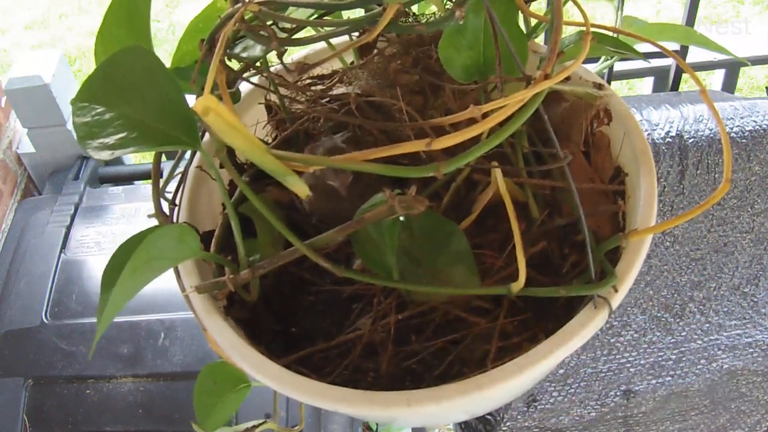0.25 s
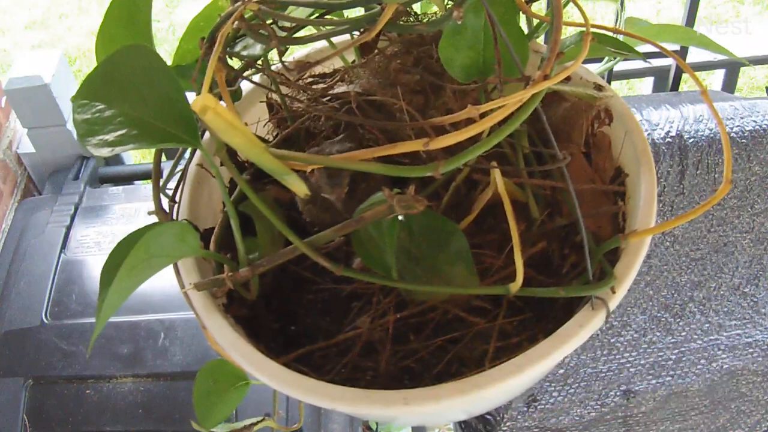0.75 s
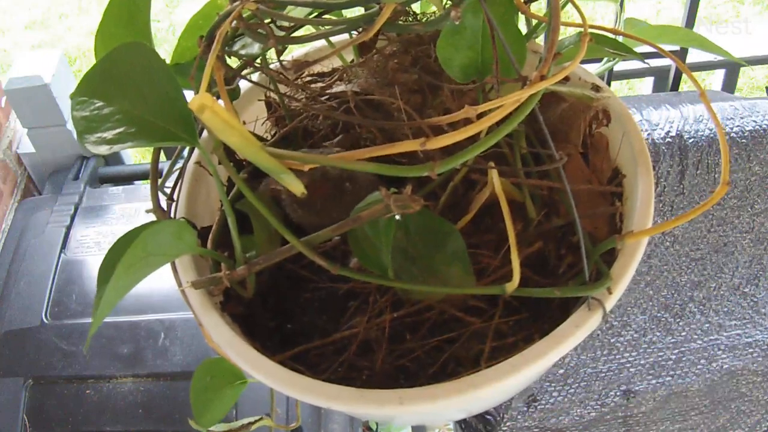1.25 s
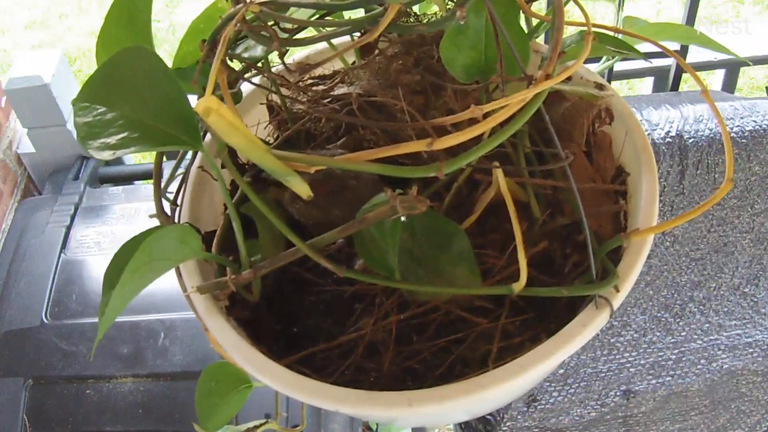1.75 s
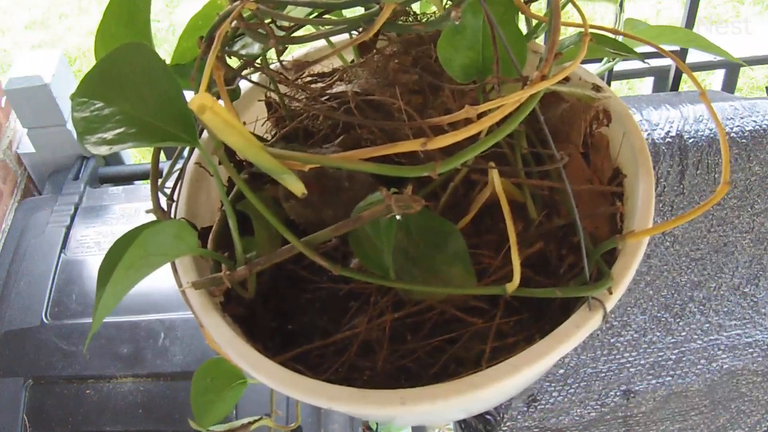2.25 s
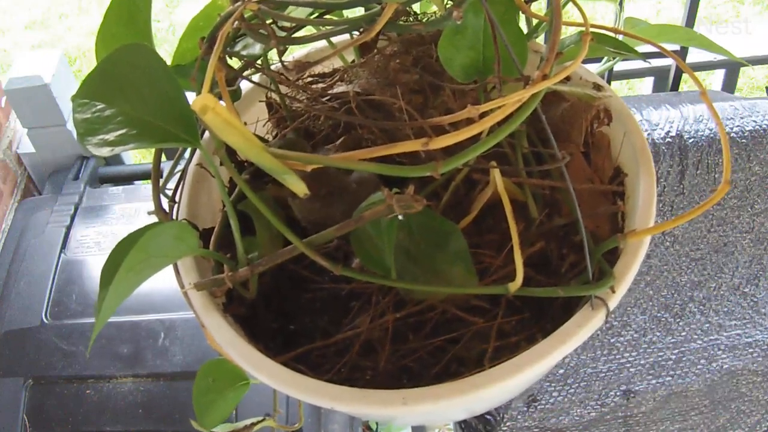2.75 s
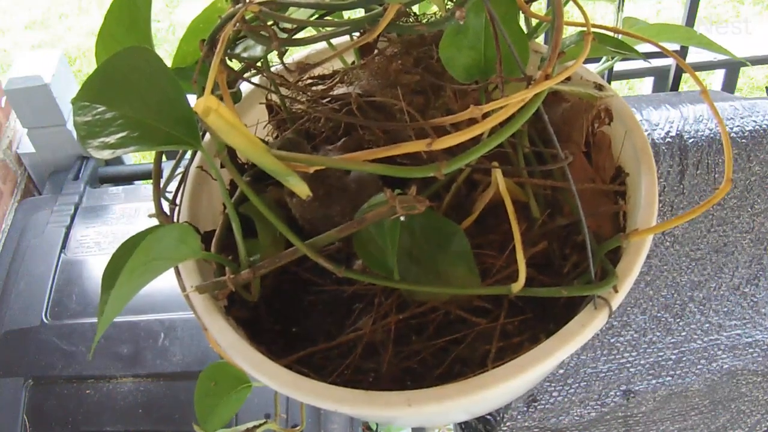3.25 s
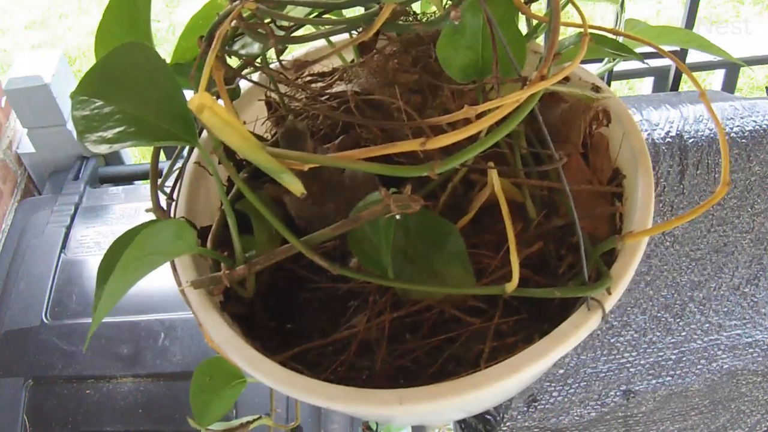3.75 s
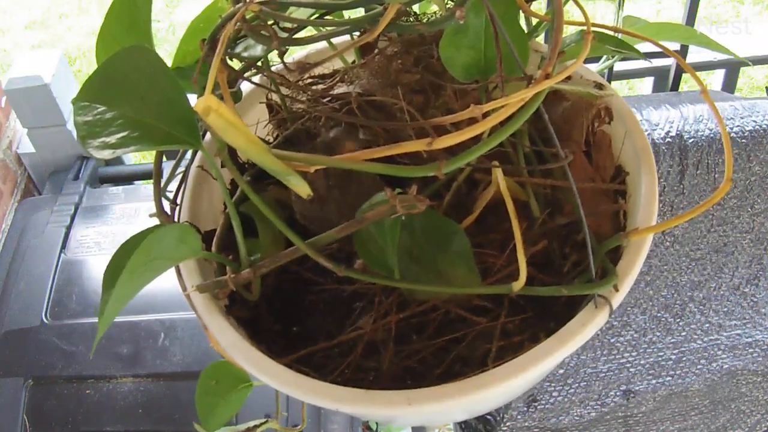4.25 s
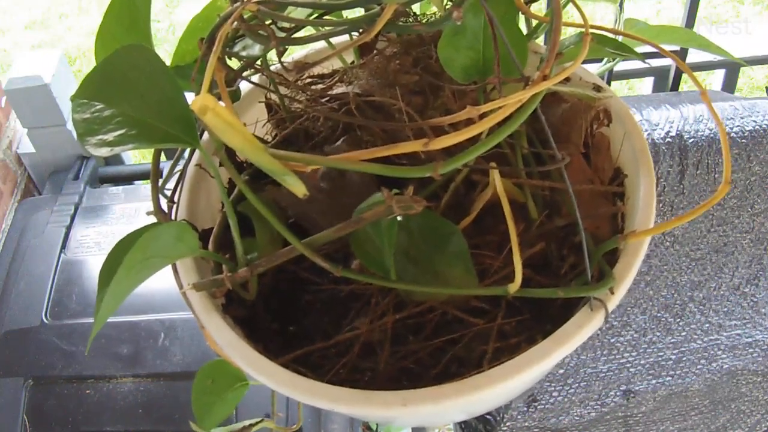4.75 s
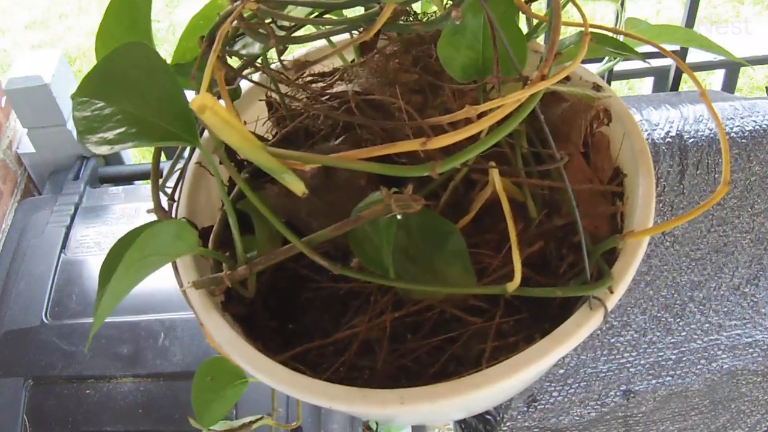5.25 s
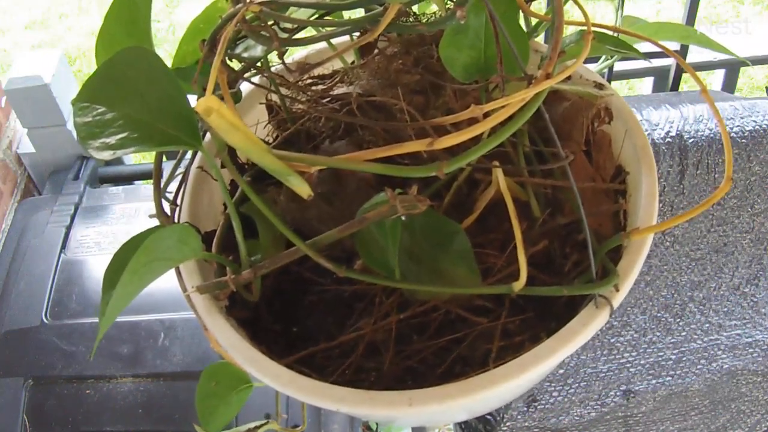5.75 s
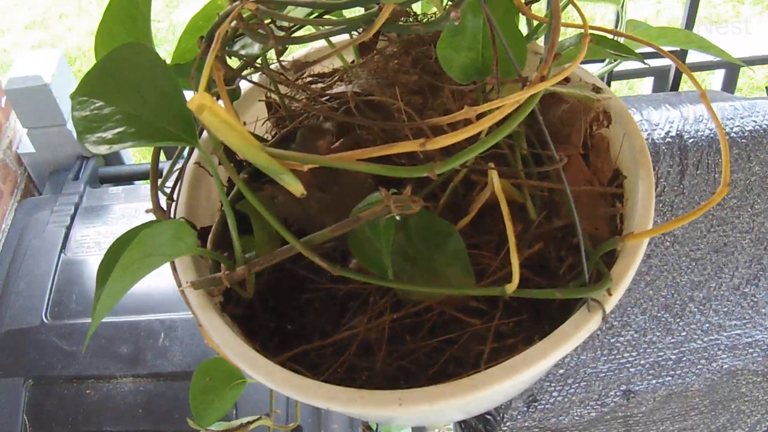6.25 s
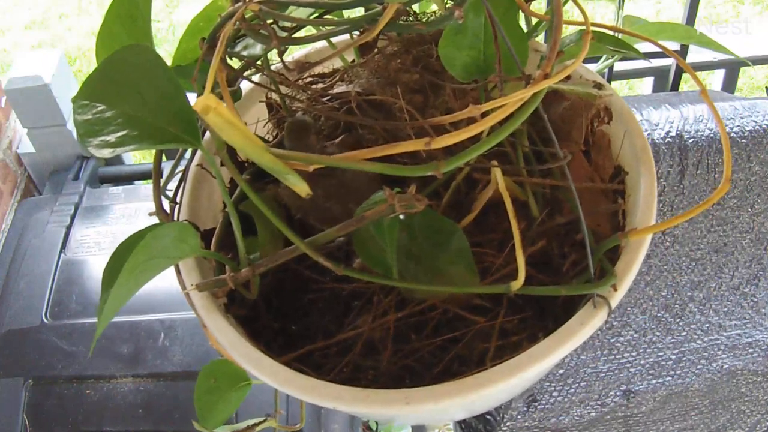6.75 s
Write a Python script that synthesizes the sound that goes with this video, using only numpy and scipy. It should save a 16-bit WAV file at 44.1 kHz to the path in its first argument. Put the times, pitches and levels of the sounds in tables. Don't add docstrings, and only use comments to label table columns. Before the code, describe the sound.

A nearby wren sings six fast, ringing repeats of one whistled phrase on a porch while a cicada rasps in bursts over faint traffic.

```python
import sys
import numpy as np
from scipy import signal
from scipy.fft import rfft, irfft
from scipy.io import wavfile
from scipy.ndimage import uniform_filter1d

SR = 44100
rng = np.random.default_rng(int(sys.argv[2]) if len(sys.argv) > 2 else 0)


def makeup_ratio(level_db):
    decades = np.asarray(level_db, float) / 20
    return 10 ** decades


def bounce(signal):
    frames = np.transpose(np.atleast_2d(signal))
    limited = np.clip(frames, -1, 1)
    pcm = np.round(limited * 32767).astype(np.int16)
    wavfile.write(sys.argv[1], SR, pcm)


N = 309384


def rms_one(x):
    return x / np.sqrt(np.mean(x ** 2) + 1e-20)


def drift(rate, count=N):
    knots = rng.standard_normal(int(count / SR * 400) + 402)
    r = np.exp(-2 * np.pi * min(rate, 150) / 400)
    slow = signal.lfilter([1], [1, -2 * r, r * r], knots)[400:]
    return np.interp(np.arange(count) * 400 / SR, np.arange(len(slow)), rms_one(slow))


def resonance(x, hz, width_hz):
    r = np.exp(-np.pi * width_hz / SR)
    poles = [1, -2 * r * np.cos(2 * np.pi * hz / SR), r * r]
    return signal.lfilter(np.array([1, 0, -1]) * (1 - r * r) / 2, poles, x)


def echoes(x, t60, gap_s, grain_db):
    t = np.arange(SR) / SR
    decay_db = grain_db * rng.standard_normal(SR) - 60 * t / t60
    tail = rng.standard_normal(SR) * makeup_ratio(decay_db) * (1 - np.exp(-t / gap_s))
    return signal.fftconvolve(x, tail / np.sqrt(np.sum(tail ** 2)))[:N]


def split(x, hz, kind):
    return signal.sosfilt(signal.butter(4, hz, kind, fs=SR, output="sos"), x)


ROAD_DB = -68.5
# (nearest time [s], distance over speed [s], level [dB])
PASSING_CARS = [(2.8, 1, -69.5), (5.802, 0.69, -66.5)]
# (frequency [Hz], density [dB per Hz])
TRAFFIC_COLOUR = [(35, -68), (60, -35), (281, -3), (450, -6.5), (705, -4.5), (861, -7.5), (1540, -9.5),
                  (2120, -15),
                  (2300, -24), (4820, -20), (5230, -21.5), (6780, -24.5), (7200, -46.5), (9360, -73),
              (15800, -120)]


def traffic(patchy_db=1.0):
    t = np.arange(N) / SR
    hz = np.maximum(np.fft.rfftfreq(N, 1 / SR), 1)
    colour = np.array(TRAFFIC_COLOUR)
    density_db = np.interp(np.log(hz), np.log(colour[:, 0]), colour[:, 1])
    spectrum = rfft(rng.standard_normal(N)) * makeup_ratio(density_db)
    scale = 1 / np.std(irfft(spectrum * (hz > 250) * (hz < 1300), N))
    cars = sum(makeup_ratio(2 * db) / (1 + ((t - s) / away_s) ** 2) for s, away_s, db in PASSING_CARS)
    road = np.sqrt(makeup_ratio(2 * ROAD_DB) + cars)
    bass = irfft(spectrum * (hz < 380), N) * makeup_ratio(-70.5)
    middle = irfft(spectrum * (hz >= 380) * (hz < 2300), N) * road * makeup_ratio(0.5 * drift(3))
    top = irfft(spectrum * (hz >= 2300), N) * makeup_ratio(-68.5 + patchy_db * drift(3.9))
    return scale * (bass + middle + top)


# (start [s], end [s], first level [dB], last level [dB], moment of one throb [s])
RASP_BURSTS = [(-.25, 0.283, -64.5, -63, .114), (1.172, 1.692, -65, -58.5, 1.468),
               (4.085, 4.67, -72.5, -68.5, 4.656), (5.225, 5.834, -61, -57, 5.672),
               (6.359, 6.872, -63, -58.5, 6.876)]
# (frequency [Hz], width [Hz], level [dB])
BODY_CAVITY = [(4673, 410, -11.5), (5784, 600, -1), (6040, 420, -6), (6706, 640, -3), (7600, 600, -10)]
RASP_BULGE_DB, RASP_RISE_DB_PER_S, RASP_FALL_DB_PER_S = 4, 361, 345
THROB_STARTS = 0.45


def cicada(clicks_per_s=900, throb_hz=25.17, throb_db=7.5):
    clicks = (rng.random(N) < clicks_per_s / SR) * rng.standard_normal(N)
    clicks = clicks + 0.16 * rng.standard_normal(N)
    body = np.zeros(N)
    for k, (hz, width_hz, db) in enumerate(BODY_CAVITY):
        ring = resonance(resonance(clicks, hz, width_hz), hz, width_hz)
        body += makeup_ratio(db) * rms_one(ring) * (-1) ** k
    t = np.arange(N) / SR
    turns = np.cumsum(throb_hz * (1 + 0.037 * drift(2.7))) / SR
    gain = np.zeros(N)
    for start, end, first_db, last_db, throb_s in RASP_BURSTS:
        done = np.clip((t - start) / (end - start), 0, 1)
        db = first_db + (last_db - first_db) * done + RASP_BULGE_DB * np.sin(np.pi * done)
        db -= RASP_RISE_DB_PER_S * np.maximum(start - t, 0)
        db -= RASP_FALL_DB_PER_S * np.maximum(t - end, 0)
        depth_db = throb_db * (THROB_STARTS + (1 - THROB_STARTS) * done)
        throb = np.cos(2 * np.pi * (turns - turns[int(throb_s * SR)]))
        gain += makeup_ratio(db - 1.65 + depth_db * throb)
    return rms_one(body * makeup_ratio(1.5 * drift(22))) * gain


# (time [s], peak level [dB], centre [Hz], decay t60 [s])
TWIG_SNAPS = [(0.759, -52.5, 3490, 0.12), (2.946, -31, 1500, 0.074), (3.255, -36.5, 1500, 0.05)]


def twigs():
    out = np.zeros(N)
    t = np.arange(SR // 10) / SR
    for s, db, hz, t60 in TWIG_SNAPS:
        at = int(s * SR)
        snap = makeup_ratio(db - 60 * t / t60) * np.minimum(t / 0.006, 1) * rng.standard_normal(len(t))
        out[at:at + len(t)] += resonance(snap, hz, hz)
    return out


# (onset [s], loudest [s], end [s], level [dB], edges below top [dB])
PHRASE_NOTES = [
    (-.176, -.162, -.148, -30, 20),
    (-.172, -0.12, -0.075, -23, 24.5),
    (-.092, -0.068, -0.042, -31.5, 16),
    (-.002, 0.005, .040, -31, 13.5),
    (0.029, 0.048, 0.11, -29.5, 22.5),
]
# (time [s], pitch [Hz])
PITCH_GLIDES = [
    [(-.176, 6965), (-.164, 4808), (-.154, 4417), (-.148, 1623)],
    [(-.172, 3543), (-.142, 3089), (-.125, 3624), (-.100, 3927), (-.080, 4006)],
    [(-.092, 2901), (-.065, 2762), (-.025, 2805)],
    [(-.006, 2099), (.012, 2160), (.028, 2315), (.040, 2516)],
    [(.030, 2601), (.044, 2772), (.068, 3432), (.090, 2564), (.102, 2450)],
]
SWELL_CURVE = 1.3
WOBBLE, HOARSE, FLUTTER_DB = 0.012, 3.1, 1.5


def sing_phrase(out, start_s, efforts_db, overtone_db=-33):
    for note, glide, effort_db in zip(PHRASE_NOTES, PITCH_GLIDES, efforts_db):
        onset, top, end, top_db, edge_db = note
        t = np.arange(onset, end, 1 / SR)
        swell_db = top_db - edge_db * np.interp(t, [onset, top, end], [1, 0, 1]) ** SWELL_CURVE
        shake = drift(130, count=SR // 4)[:len(t)]
        pitch = uniform_filter1d(np.interp(t, *np.transpose(glide)), size=200, mode="nearest")
        wobble = WOBBLE * shake * (1 + HOARSE * (pitch > 4200))
        phase = 2 * np.pi * np.cumsum(pitch * (1 + wobble)) / SR
        flutter_db = FLUTTER_DB * drift(140, count=SR // 4)[:len(t)]
        tone = np.sin(phase) + makeup_ratio(overtone_db) * np.sin(2 * phase)
        at = int((start_s + onset) * SR)
        out[at:at + len(t)] += makeup_ratio(swell_db + effort_db + flutter_db) * tone * np.sqrt(2)


# (time [s], level [dB])
FAR_PHRASES = [(4.061, -48.5), (4.318, -48.5), (4.577, -43.5), (4.84, -42.5), (5.102, -46.5)]


def far_wren():
    dry = np.zeros(N)
    for s, level_db in FAR_PHRASES:
        sing_phrase(dry, s - 0.008, level_db + np.array([-7, -2.0, -5, 7.0, -7]))
    return echoes(dry, 0.13, gap_s=0.008, grain_db=6)


# (time [s], effort [dB], chip level [dB], dip level [dB], low note level [dB])
NEAR_PHRASES = [(1.745, -5.5, -7.5, -3.5, -3), (2.045, -1.5, -4.5, -0.8, -4.5), (2.347, -1.5, -2, -2, -0.5),
                (2.651, 0, -0.5, -1.5, 0), (2.955, -2, -1, -0.1, 1.2), (3.264, -1.9, -0.5, -5.5, 0.76)]
ARCH_FOLLOWS, ARCH_LIFT_DB = 0.85, 1.5
PORCH_T60_S, PORCH_DB = 0.15, -2
PORCH_TREBLE_T60_S, PORCH_TREBLE_DB = 0.11, 1.5
YARD_T60_S, YARD_DB = 0.99, -26.5


def wren():
    dry = np.zeros(N)
    for s, effort_db, chip_db, dip_db, low_db in NEAR_PHRASES:
        arch_db = ARCH_FOLLOWS * effort_db + ARCH_LIFT_DB
        sing_phrase(dry, s, [chip_db, effort_db, dip_db, low_db, arch_db])
    low, high = split(dry, 4200, "low"), split(dry, 4200, "high")
    porch = makeup_ratio(PORCH_DB) * echoes(low, PORCH_T60_S, gap_s=0.0037, grain_db=8.5)
    porch += makeup_ratio(PORCH_TREBLE_DB) * echoes(high, PORCH_TREBLE_T60_S, gap_s=0.003, grain_db=6)
    yard = makeup_ratio(YARD_DB) * echoes(dry, YARD_T60_S, gap_s=0.062, grain_db=-0.5)
    return dry + porch + yard


def scene():
    dip = signal.butter(2, [4930, 5480], "bandstop", fs=SR, output="sos")
    far = signal.sosfilt(dip, traffic() + cicada())
    return (far + far_wren() + twigs() + wren())[None]


CAMERA_SR = 16000
BAND_EDGES = [*range(0, 88, 8), *range(88, 196, 12), *range(196, 260, 16), *range(260, 320, 20),
              *range(320, 368, 24),
              368, 396, 424, 456, 492, 532, 572, 616, 664, 716, 772, 832, 880, 960, 1024]
# (frequency [Hz], step over band level [dB])
ROUNDING_STEP = [(60, 12), (140, 10), (210, 2), (500, 0), (1800, 6.8), (2500, 9.5), (5400, 9.5), (5700, 8)]


def camera_rounding(x, jitter, size, busy_db=-52.0, faint_db=-76):
    n = np.arange(2 * size)
    lead = 2 * size - (593 + 448 * (size < 1024)) % size
    angles = np.pi / size * np.outer(n + 0.5 + size / 2, np.arange(size) + 0.5)
    basis = np.cos(angles) * np.sqrt(2 / size)
    window = signal.windows.kaiser_bessel_derived(2 * size, 4 * np.pi)
    padded = np.pad(x, (lead, 3 * size))
    lines = np.lib.stride_tricks.sliding_window_view(padded, 2 * size)[::size] * window @ basis
    edges = np.unique(np.array(BAND_EDGES) * size // 1024 // 4 * 4)
    widths = np.diff(edges)
    hz = (edges[:-1] + widths / 2) * 8000 / size
    band_db = 10 * np.log10(np.add.reduceat(lines ** 2, edges[:-1], axis=1) / widths + 1e-20)
    mask_db, spread_db = -11, 7
    bands = np.arange(len(widths))
    apart = np.abs(np.subtract.outer(bands, bands))
    hiding_db = np.where(apart > 0, mask_db - spread_db * (apart - 1), 0)
    masked_db = (band_db[:, None] + hiding_db).max(axis=2)
    luck = jitter[:len(lines), :len(widths)]
    step_hz, over_db = np.array(ROUNDING_STEP).T
    step_db = masked_db + np.interp(np.log(hz), np.log(step_hz), over_db) + luck
    step_db -= 0.19 * np.maximum(band_db + 60, 0) * np.where(hz < 4150, 1, 0.7)
    treble_db = band_db[:, hz > 2500].max(axis=1, keepdims=True)
    step_db = np.where(hz > 4150, np.maximum(step_db, treble_db - 29 + luck), step_db)
    starved = (hz > 6900) & ((treble_db + luck > busy_db) | (band_db < faint_db))
    step = np.repeat(makeup_ratio(step_db + 60 * starved), widths, axis=1)
    rounded = np.floor((np.abs(lines) / step) ** 0.75 + 0.4054) ** (4 / 3)
    lines = np.sign(lines) * step * rounded
    halves = (lines @ basis.T * window).reshape(-1, 2, size)
    joined = halves[1:, 0] + halves[:-1, 1]
    return joined.ravel()[lead - size:][:len(x)]


# (low [Hz], high [Hz])
ENVELOPE_BANDS = [(1800, 2450), (4200, 7000)]


def follow_envelope(rounded, source, share=0.52, slack_db=6.5):
    hz = np.fft.rfftfreq(len(rounded), 1 / CAMERA_SR)
    out = rounded.copy()
    for low, high in ENVELOPE_BANDS:
        band = (hz > low) * (hz < high)
        smeared = irfft(rfft(rounded) * band, len(rounded))
        true = irfft(rfft(source) * band, len(source))
        ratio = uniform_filter1d(smeared ** 2, size=320) / uniform_filter1d(true ** 2, size=320)
        excess_db = 10 * np.log10(ratio + 1e-9)
        out += smeared * (makeup_ratio(-share * np.maximum(excess_db - slack_db, 0)) - 1)
    return out


SHORT_MOMENTS = [1.525]


def camera(x):
    x = signal.resample_poly(x, 160, 441)
    jitter_db = 3 * rng.standard_normal((len(x) // 128 + 8, len(BAND_EDGES)))
    t = np.arange(len(x)) / CAMERA_SR
    short = sum(np.clip((0.038 - np.abs(t - s)) / 0.004, 0, 1) for s in SHORT_MOMENTS)
    long_blocks = follow_envelope(camera_rounding(x, jitter_db, size=1024), x)
    x = (1 - short) * long_blocks + short * camera_rounding(x, jitter_db, size=128)
    return np.pad(signal.resample_poly(x, 441, 160), (0, 8))[None, :N]


def top_cut(x):
    return signal.sosfilt(signal.butter(12, 8830, fs=SR, output="sos"), x)


def record(dry):
    bass_cut = signal.butter(2, 150, "high", fs=SR, output="sos")
    mix = camera(signal.sosfilt(bass_cut, dry[0]))
    return top_cut(mix)


dry = scene()
out = record(dry)
bounce(out)
```